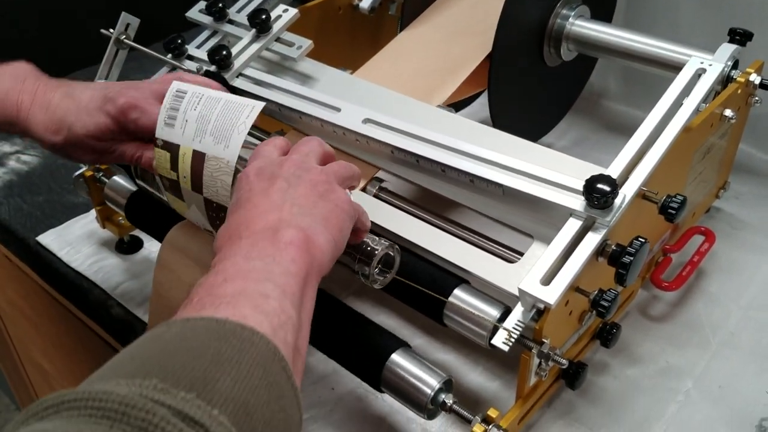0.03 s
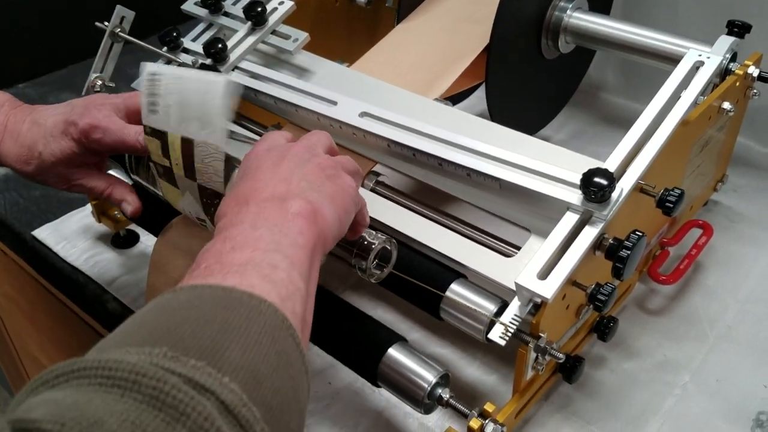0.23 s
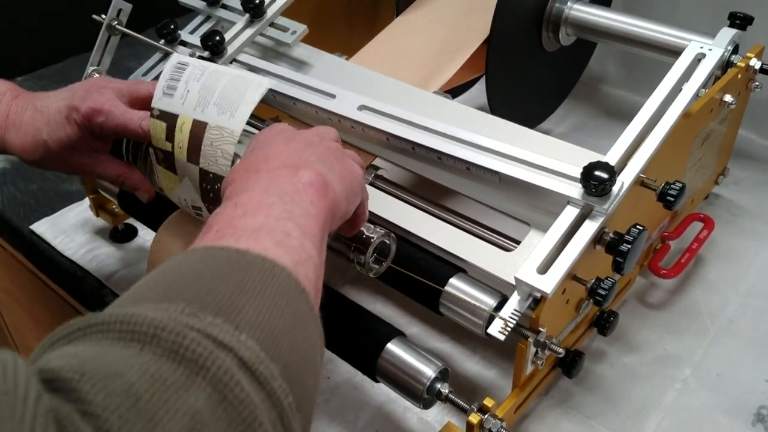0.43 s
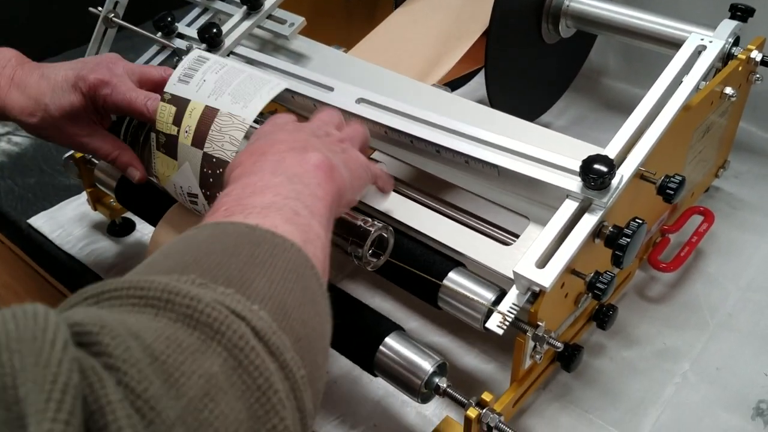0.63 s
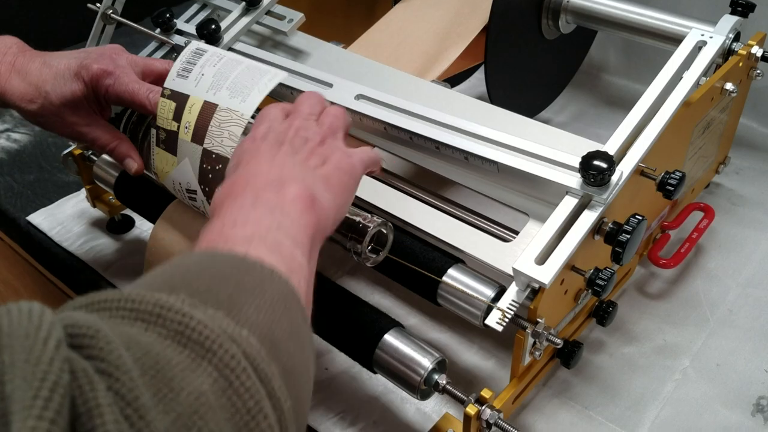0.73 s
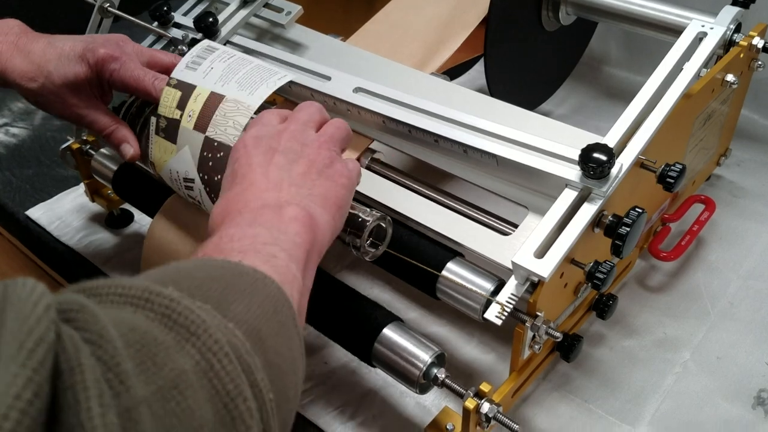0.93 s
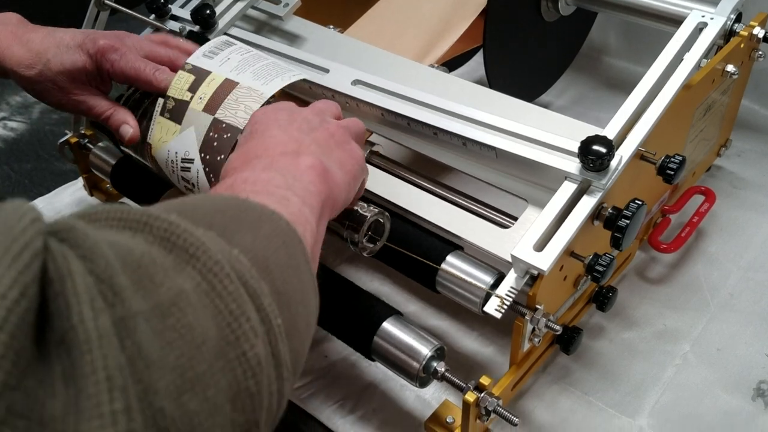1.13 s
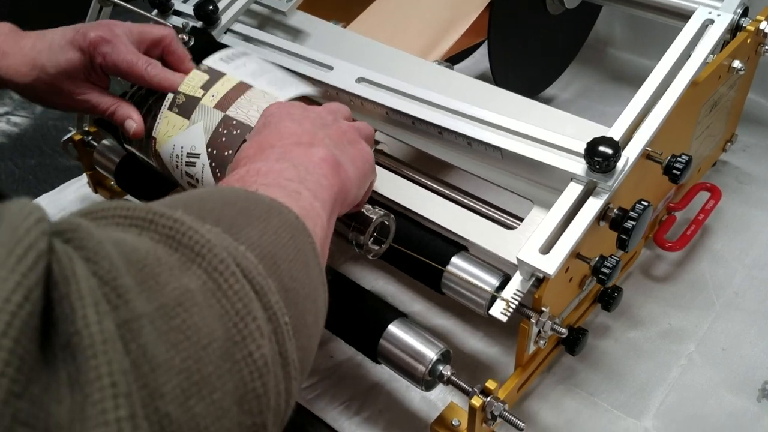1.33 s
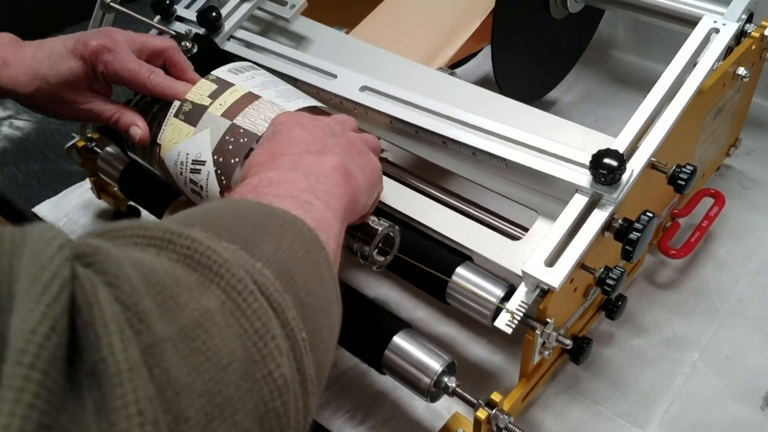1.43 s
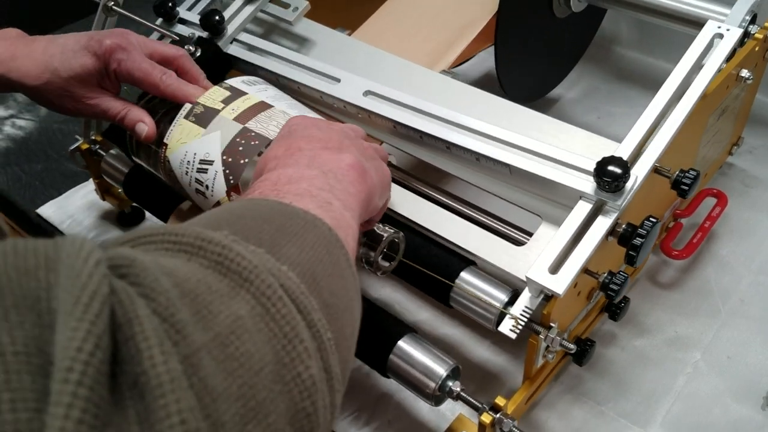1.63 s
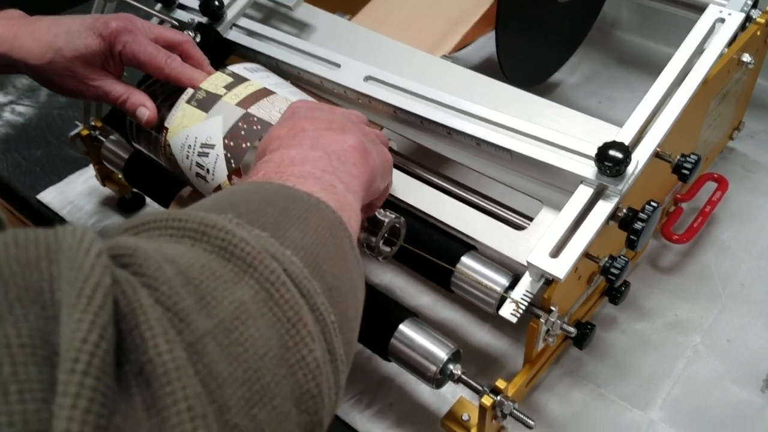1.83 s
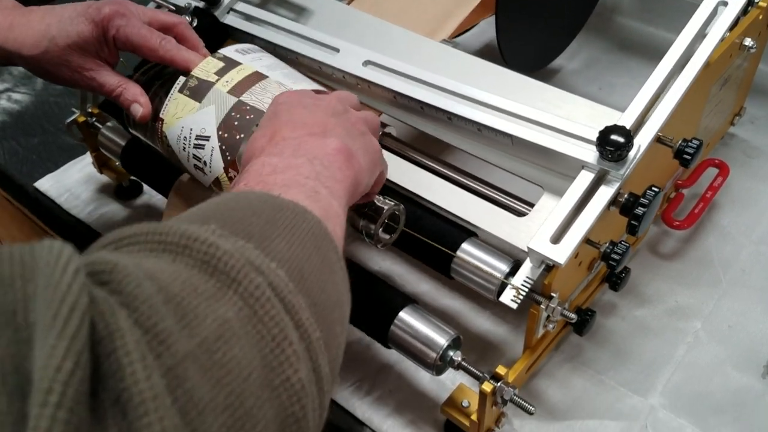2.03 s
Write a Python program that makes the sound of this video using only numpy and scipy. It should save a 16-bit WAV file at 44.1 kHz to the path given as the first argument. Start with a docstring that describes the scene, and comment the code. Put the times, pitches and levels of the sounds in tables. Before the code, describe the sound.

A glass bottle rubbed and turned by palms on a label jig, knocking the frame hard twice

```python
"""Palms rub over the paper label of a glass bottle, turned and pressed onto the rubber rollers of a jig.
The rubbing is shaped noise. The bottle knocks hard twice on the frame, with four weaker rebounds:
ringing modes with bursts of noise, one of them the bright top of the hardest knock.
The label snaps (noise bursts), flaps (short ringing modes) and scrapes (noise with resonances).
Small ticks, soft low pushes, a rattle and two dull taps are heard over workshop air noise and hum."""
import sys
import numpy as np
from scipy import signal
from scipy.fft import rfft, irfft, next_fast_len
from scipy.io import wavfile
from scipy.ndimage import uniform_filter1d, map_coordinates

SR = 44100
rng = np.random.default_rng(int(sys.argv[2]) if len(sys.argv) > 2 else 0)


def dump(signal):
    """Clip the signal to [-1, 1] and save it as 16-bit WAV at the path in sys.argv[1]."""
    limited = np.clip(np.atleast_2d(signal).T, -1, 1)
    pcm = np.round(limited * 32767).astype(np.int16)
    wavfile.write(sys.argv[1], SR, pcm)


N = 92345
T = np.arange(SR // 4) / SR  # time axis of one short sound, in seconds

# How alike left and right are in rubbing sounds: f/Hz, likeness (1 = same, 0 = unrelated)
RUB_ALIKE = [(500, 0.95), (2000, 0.29), (5000, -0.12), (14000, -0.22)]
# Tone colour of the short noise bursts and of the scrape's hiss: f/Hz, relative level/dB per Hz
PAPER_COLOUR = [(700, -50), (1300, 0), (1900, -6), (2600, -27), (3700, -17.5), (4500, -13), (7300, -10.5),
                (8300, -14.5), (10600, -17), (12900, -5), (16300, -8)]
# Tone colour of a hard crack: f/Hz, relative level/dB per Hz
CRACK_COLOUR = [(900, -31), (1800, -5), (2900, -11.5), (3700, -4), (6000, -7.5), (7000, -9.5), (8700, -6),
                (9700, -14), (11300, -2.5), (13000, -12), (15200, -7), (16300, -10)]


def amp(db):
    """Turns decibels into a gain."""
    return 10 ** (np.asarray(db) / 20)


def unit(x):
    """Scales a sound to rms 1."""
    return x / np.sqrt(np.mean(x ** 2) + 1e-20)


def along(points, hz):
    """Reads a (frequency, value) table at any frequency, on a log axis."""
    f, v = np.transpose(points)
    return np.interp(np.log(hz + 1), np.log(f + 1), v)


def curves(rows):
    """Draws straight lines between table rows: one curve for each column after the time."""
    s, *cols = np.transpose(rows)
    return [np.interp(np.arange(N) / SR, s, c) for c in cols]


def filtered(x, response):
    """Filters a sound by multiplying its spectrum with a response."""
    m = next_fast_len(x.shape[-1] + 8192)  # spare room keeps the end from wrapping to the start
    spectrum = rfft(x, m) * response(np.fft.rfftfreq(m, 1 / SR))
    return irfft(spectrum, m)[..., :x.shape[-1]]


def sides(pan_db):
    """Left and right gains; pan_db is how much louder the left is."""
    return amp(np.multiply.outer([.5, -.5], pan_db))


def rush(spectrum, alike, patchy_db):
    """Stereo noise of rms 1, with smooth patches of random gain over time and frequency."""
    z = signal.stft(rng.standard_normal((2, N)), nperseg=512)[2]
    field = rng.standard_normal(z.shape[1:])
    field = uniform_filter1d(field, size=6, axis=0)
    field = uniform_filter1d(field, size=8, axis=1)
    pair = signal.istft(z * amp(patchy_db * unit(field)), nperseg=512)[1][:, :N]

    def mid_side_response(hz):
        turn = np.arccos(np.clip(along(alike, hz), -1, 1)) / 2
        return amp(along(spectrum, hz)) * [np.cos(turn), np.sin(turn)]

    mid, side = filtered(pair, mid_side_response)
    return unit(np.array([mid + side, mid - side]))


def grain(depth_db):
    """A fast random gain of rms 1 that makes a sound rough."""
    per_s = 150  # random points per second
    knots = rng.standard_normal(int(N * per_s / SR) + 4)
    return unit(amp(depth_db * map_coordinates(knots, [np.arange(N) * per_s / SR])))


def ring(modes, rise_s, scatter_db):
    """Dying sine modes (f/Hz, level/dB, t60/s) of alternate sign, levels varied on every call."""
    total = 0
    for k, (hz, db, t60) in enumerate(modes):
        level_db = db + scatter_db * rng.standard_normal() - 60 * T / t60
        total = total + (-1) ** k * amp(level_db) * np.sin(2 * np.pi * hz * T)
    return total * (1 - np.exp(-T / rise_s))


def tilted(modes, tilt_db, pivot_hz):
    """Makes modes brighter or duller by tilt_db per octave around a pivot."""
    return [(hz, db + tilt_db * np.log2(hz / pivot_hz), t60) for hz, db, t60 in modes]


def burst(spectrum, t60, alike, centre_hz=8000, octaves=10, spike_db=-60, rise_s=.0001):
    """A dying stereo noise burst around a centre frequency, led by a faster-dying spike."""
    spike_t60_s = 0.0074
    a, b = rng.standard_normal((2, len(T)))
    turn = np.arccos(np.clip(alike, -1, 1)) / 2
    pair = np.cos(turn) * a + np.multiply.outer([1, -1], np.sin(turn) * b)

    def response(hz):
        bell = np.exp(-.5 * (np.log2((hz + 1) / centre_hz) / octaves) ** 2)
        return amp(along(spectrum, hz)) * bell

    decay = amp(-60 * T / t60) + amp(spike_db - 60 * T / spike_t60_s)
    return unit(filtered(pair, response)) * decay * (1 - np.exp(-T / max(rise_s, 1 / SR)))


def swing(hz, peak_s):
    """A short swing whose strength peaks at peak_s and then dies quickly."""
    return T / peak_s * np.exp(1 - T / peak_s) * np.sin(2 * np.pi * hz * T)


def silence():
    """An empty stereo stretch with spare room at the end."""
    return np.zeros((2, N + SR))


def add(out, s, sound, pan_db, lag_s=0):
    """Places a sound at time s; the left side hears it lag_s after the right."""
    sound = np.broadcast_to(sound, (2, len(T))) * sides(pan_db)[:, None]
    for ch, at in enumerate([s + lag_s / 2, s - lag_s / 2]):
        out[ch, round(at * SR):][:len(T)] += sound[ch]


def palms():
    """Skin sliding on paper: hiss, a bright top and a rough middle coloured by the bottle."""
    # Palms on the label: t/s, hiss level/dB, top over hiss/dB, middle over hiss/dB,
    # left over right/dB (hiss and top only)
    strokes = [(0, -54, 7, 1.5, -0.5), (0.03, -53.5, 8, 3, -1), (0.11, -55, 5, 2, 0),
               (0.15, -54.5, -13, 6, -4), (0.22, -56.5, 5.5, 8.5, -2.5), (0.3, -61.5, 4, 2.5, -2.5),
               (0.36, -56.5, 5, 3.5, -1), (0.47, -52.5, 3.5, 1, -1.5), (0.53, -55.5, 6.5, 5, -2),
               (0.565, -66.5, -7, 5, -3), (0.6, -70, 0, 3.5, -3), (0.72, -74, 3, 2.5, -2),
               (0.82, -69.5, 1, 4.5, -3), (0.86, -59.5, 3, 3.5, -3), (0.91, -53, 3, 2, -1),
               (0.96, -51, 3.5, 4, -3.5), (1.03, -54, 4, 1, -0.5), (1.065, -58, -6, -1, -15),
               (1.095, -51.5, -7.5, 4.5, -10), (1.12, -52, 1, 2, -4.5), (1.14, -55, -2, -1.5, -3),
               (1.17, -57, -1, 0, -2), (1.2, -60.5, -3.5, -0.5, -2), (1.26, -62, -2, -1, -3),
               (1.4, -62.5, 3.5, 2, -2), (1.49, -62.5, 2, 0.5, -3), (1.52, -58, 3.5, 2, -1),
               (1.64, -58.5, 3.5, -0.5, -2), (1.7, -71, -1, 1.5, -3), (1.76, -77, -1, -2, -4),
               (1.81, -63.5, 1, 0, -2.5), (1.86, -78.5, 2, 4.5, -4), (1.92, -66, -2.5, -1, -4.5),
               (2.02, -66.5, -1, 3, -4), (2.09, -65, -3, 4.5, -2)]
    # Tone colours of the three parts: f/Hz, relative level/dB per Hz
    hiss_colour = [(3200, -3), (4200, -5), (6200, -5), (9000, -7), (11500, -8)]
    top_colour = [(6180, -13), (10500, -16.5), (11800, -4.5), (15100, -4.5), (16000, -5), (16300, -2)]
    middle_colour = [(400, -8), (530, -3), (750, -10), (1100, -6), (1220, -3), (1400, -7), (2500, -13),
                     (2900, -2.5), (3400, -9), (4000, -16)]

    def closed(colour):
        # both ends fall away to almost nothing
        return [(colour[0][0] * .9, -120)] + list(colour) + [(colour[-1][0] * 1.1, -120)]

    hiss_db, top_db, middle_db, pan_db = curves(strokes)
    hiss = rush(closed(hiss_colour), RUB_ALIKE, patchy_db=0.4)
    top = amp(top_db) * rush(closed(top_colour), RUB_ALIKE, patchy_db=1)
    roughness = grain(1.5)
    middle = amp(middle_db) * roughness * rush(closed(middle_colour), RUB_ALIKE, patchy_db=2.0)
    return amp(hiss_db) * ((hiss + top) * sides(pan_db) + middle)


def workshop():
    """Steady air noise plus hum made of narrow bands of noise, which waver by nature."""
    # Air of the workshop: f/Hz, relative level/dB per Hz
    air_colour = [(25, -38), (42, -11), (56, -23), (72, -7), (87, -2.5), (127, -3.5), (225, -9.5),
                  (251, -8.5), (455, -18.5), (507, -22), (665, -20.5), (741, -20.5), (2080, -29),
                  (2720, -28), (4680, -69), (16300, -57)]
    # How alike left and right are: f/Hz, likeness (1 = same, 0 = unrelated)
    air_alike = [(60, 0.83), (180, 0.95), (550, 0.39), (1650, 0.11), (4970, 0.054), (15000, 0.016)]
    # Hum bands: f/Hz, width/Hz, rms level/dB
    hum_bands = [(59, 6, -61), (119, 10, -58), (204, 5, -60), (298, 20, -72), (446, 20, -72),
                 (529, 36, -73.5)]
    air_db = -56
    hum = 0
    for hz, width, db in hum_bands:
        band = filtered(rng.standard_normal(N), lambda f: 1 / (1 + ((f - hz) / width * 2) ** 2))
        hum = hum + amp(db) * unit(band)
    return amp(air_db) * rush(air_colour, air_alike, patchy_db=-0.24) + hum


def ticks():
    """Small ticks, each a few quickly dying modes."""
    # Ticks: t/s, level/dB (lowered by 2 dB below)
    times = [(0.0252, -44), (0.6373, -37.5), (0.8075, -42), (1.3323, -46.5), (1.5086, -51), (1.6386, -51),
             (1.7702, -48), (1.939, -48), (2.0155, -51)]
    # Modes of a tick: f/Hz, level/dB, t60/s
    tick_modes = [(1510, -1, 0.029), (1694, -6.5, 0.024), (1990, -3.5, 0.011)]
    out = silence()
    for s, db in times:
        add(out, s, amp(db - 2) * ring(tick_modes, rise_s=.0008, scatter_db=1), pan_db=-2.5)
    return out[:, :N]


def short_noise_bursts():
    """Noise bursts, each with its own pitch range and decay: label snaps and a knock's bright top."""
    # Label snaps and, at 1.0539 s, the bright top of the hardest knock:
    # t/s, level/dB, left over right/dB, t60/s, centre f/Hz, width/octaves, rise/s
    events = [(.0678, -35.5, -5, 0.023, 3540, 0.83, .001), (.1327, -14, 1.5, 0.0066, 11000, 1.53, 0.00015),
              (.1335, -24.5, 4, 0.018, 9050, 0.74, 0.00027), (.167, -23.5, 8, 0.017, 12000, 1.1, 0.0011),
              (.1688, -25.5, -4, 0.031, 10900, 2.5, 0.00076), (.5496, -42, -1, .022, 10800, .6, .001),
              (.7656, -56, -4, 0.044, 5200, .28, 0.00086), (.9916, -33.5, -4, 0.017, 5000, 1.34, .0002),
              (1.0046, -35.5, 2, 0.04, 13200, 0.3, .001), (1.0539, -14, 3, 0.0132, 11230, 0.17, .0003),
              (1.1085, -27, -3.5, 0.021, 6460, 0.88, .002), (1.161, -43, -1, 0.056, 14000, .15, .005)]
    out = silence()
    for s, db, pan_db, t60, hz, octaves, rise_s in events:
        noise = burst(PAPER_COLOUR, t60, alike=0, centre_hz=hz, octaves=octaves, rise_s=rise_s)
        add(out, s, amp(db) * noise, pan_db)
    return out[:, :N]


def catches():
    """The label edge catches and lets go: a short run of tiny random slips makes the paper ring."""
    # Catches: t/s, level/dB, brightness/dB per octave
    events = [(.1328, -28, 0.5), (0.1367, -35, -4), (.1645, -38, -3), (0.1709, -25, -2.5), (.1738, -28, 8),
              (.1922, -30, -3), (.2022, -37, -1)]
    # Modes of the flapping paper: f/Hz, level/dB, t60/s
    flap_modes = [(830, -11.5, 0.022), (1380, -21, .02), (1833, 2.5, 0.019), (2390, -15, 0.028),
                  (2960, -4.5, 0.014), (3550, -0.5, 0.018)]
    slip_s = .0007  # the slips fade with this time constant
    out = silence()
    for s, db, tilt_db in events:
        modes = tilted(flap_modes, tilt_db, pivot_hz=flap_modes[2][0])
        slips = rng.standard_normal(len(T)) * np.exp(-T / slip_s)
        slips = slips / np.linalg.norm(slips)
        flap = signal.fftconvolve(ring(modes, rise_s=.0003, scatter_db=1.5), slips)[:len(T)]
        add(out, s, amp(db) * flap, pan_db=3, lag_s=-0.00011)
    return out[:, :N]


def scrape():
    """The label edge drags in a few uneven slips: paper hiss plus noise through body resonances."""
    # Dragging label edge: t/s, hiss level/dB, body level/dB
    drag = [(.145, -58, -69), (.157, -42, -55), (.166, -42, -40.5), (.172, -54, -37.5), (.185, -62, -46.5),
            (.195, -68, -44.5), (.215, -70, -64)]
    # Resonances of the body: f/Hz, width/Hz, level/dB
    resonances = [(370, 300, -9), (840, 460, -11.5), (1760, 280, 0.5), (2880, 360, 0.5), (3530, 330, -0.5)]
    before = (drag[0][0] - .01, -90, -90)
    after = (drag[-1][0] + .01, -90, -90)
    hiss_db, body_db = curves([before] + list(drag) + [after])

    def body_response(f):
        total = 0
        for k, (centre, width, db) in enumerate(resonances):
            damping = 1j * f * width
            total = total + (-1) ** k * amp(db) * damping / (centre * centre - f * f + damping)
        return total

    a, b = rng.standard_normal((2, N))
    body = amp(body_db) * unit(filtered(np.array([a + b, a - b]), body_response))
    hiss = amp(hiss_db) * rush(PAPER_COLOUR[3:], RUB_ALIKE, patchy_db=1.5)
    return (hiss + body) * sides(10)[:, None]


def soft_pushes():
    """Soft low pushes: each is one short low swing."""
    # Pushes: t/s, level/dB, f/Hz
    pushes = [(.185, -43.5, 188), (.95, -39.5, 128), (0.518, -38.5, 171), (1.347, -38.5, 166),
              (2.025, -46, 105)]
    out = silence()
    for s, db, hz in pushes:
        add(out, s, amp(db) * swing(hz, peak_s=0.0041), 0)
    return out[:, :N]


def knocks():
    """Glass hits the frame: bottle modes, a noise crack, a first short swing and a frame thud."""
    # Two hard blows and four weaker rebounds: t/s, level/dB, crack trim/dB, thud trim/dB,
    # left over right/dB (not the thud), brightness of the ring/dB per octave
    blows = [(0.932, -14, 0.5, -1, -1.5, 2.5), (0.94, -26, -2, -9, 4.5, -8.5),
             (1.054, -8.5, 3.5, 0.5, -1, -1.5), (1.0824, -26.5, -5, -1.5, 1, -5.5),
             (1.092, -31.5, 4, -23, -5, -7.5), (1.1082, -36.5, 7.5, -15.5, -3, -11)]
    # Modes of the bottle: f/Hz, level/dB, t60/s
    bottle_modes = [(512, -2.5, 0.02), (796, -0.5, 0.017), (1080, -4.5, 0.027), (1215, -18, 0.25),
                    (1293, -7, 0.063), (1610, -12.5, 0.057), (1953, -16, 0.08), (2337, -9, 0.034),
                    (2922, 3.5, 0.019), (4530, -19, 0.023)]
    # Modes of the frame: f/Hz, level/dB, t60/s
    frame_modes = [(46.2, -18, 0.6), (102.7, -1, 0.28), (134.4, 0, 0.27), (163.8, 0.5, 0.23), (204, 1, 0.2),
                   (296, 1, 0.11)]
    ring_db, crack_base_db, clack_db, thud_base_db = -14.5, -15, -7.5, -24
    out = silence()
    for s, db, crack_db, thud_db, pan_db, tilt_db in blows:
        modes = tilted(bottle_modes, tilt_db, pivot_hz=1200)
        glass = amp(ring_db) * ring(modes, rise_s=.00015, scatter_db=1.5)
        crack = burst(CRACK_COLOUR, 0.043, alike=-0.3, spike_db=6.5)
        crack = amp(crack_db + crack_base_db) * crack
        clack = amp(clack_db) * swing(1164, peak_s=.0004)
        add(out, s, amp(db) * (glass + crack + clack), pan_db)
        thud = ring(frame_modes, rise_s=0.016, scatter_db=1)
        add(out, s, amp(db + thud_db + thud_base_db) * thud, 0)
    return out[:, :N]


def rattle():
    """The bottle settles on the rollers after the hardest knock: rough, patchy noise."""
    # Settling bottle: t/s, level/dB
    settling = [(1.052, -90), (1.058, -41), (1.075, -47), (1.086, -48), (1.1, -48), (1.112, -44),
                (1.13, -46), (1.16, -64), (1.2, -88)]
    # Its tone colour: f/Hz, relative level/dB per Hz
    colour = [(250, -60), (350, -14.5), (510, -9.5), (940, -17), (1200, -3), (1450, -10), (1950, -4),
              (2500, -9.5), (4000, -16), (5500, -60)]
    level_db, = curves(settling)
    return amp(level_db) * grain(5) * rush(colour, RUB_ALIKE, patchy_db=3.5)


def dry_tap():
    """A tap felt through the camera: modes that reach left and right unequally, plus a faint crack."""
    # Modes: f/Hz, left level/dB, right level/dB, first swing (+1 or -1), right lag/turns, t60/s
    tap_modes = [(437, -19, -24, 1, 0.54, 0.029), (620, -39, -17, -1, 0.14, 0.025),
                 (990, -17.5, -25, -1, 0.075, 0.015), (1440, -17.5, -33, -1, 0.13, 0.0086),
                 (2090, -19, -39, 1, 0, 0.0083), (2550, -30, -55, -1, 0, 0.012)]
    rise_turns, low_cut_hz = 0.27, 380
    tap = 0
    for hz, left_db, right_db, first, turns, t60 in tap_modes:
        rise = 1 - np.exp(-T * hz / rise_turns)  # low modes take longer to swell
        level = amp([[left_db], [right_db]] - 60 * T / t60)
        wave = np.sin(2 * np.pi * (hz * T - np.array([[0], [turns]])))
        tap = tap + np.sign(first) * rise * level * wave
    tap = filtered(tap, lambda f: (1j * f / low_cut_hz / (1 + 1j * f / low_cut_hz)) ** 2)
    crack = amp(-31) * burst(CRACK_COLOUR, .01, alike=.2)
    out = silence()
    add(out, 1.544, tap + crack, 0)
    return out[:, :N]


def soft_bump():
    """A soft bump, mostly on the left: one smooth pulse followed by a low ring."""
    # Ring after the bump: f/Hz, level/dB, t60/s
    bump_modes = [(150, -1, 0.045)]
    bump_s, width_s, pulse_hz = 1.9162, .00038, 600
    lead = 3 * width_s  # the pulse starts this long before its middle
    pulse = -np.exp(-.5 * ((T - lead) / width_s) ** 2) * np.cos(2 * np.pi * pulse_hz * (T - lead))
    after = ring(bump_modes, rise_s=0.0011, scatter_db=2.0)
    after = np.pad(after, (round(2 * lead * SR), 0))[:len(T)]
    out = silence()
    add(out, bump_s - lead, amp(-34.5) * (pulse + after), pan_db=15.5)
    return out[:, :N]


def room(x):
    """Room echo: a noise tail in which each frequency dies at its own speed."""
    # Echo decay: f/Hz, t60/s
    decay = [(200, 0.18), (2000, 0.72), (12000, 0.19)]
    hz, t, z = signal.stft(rng.standard_normal((2, SR // 2)), SR, nperseg=256)
    tail = signal.istft(z * amp(-60 * t / along(decay, hz)[:, None]), SR, nperseg=256)[1]
    tail = tail / np.linalg.norm(tail[0])
    delayed = np.pad(x.mean(0), (120, 0))[None]  # the echo starts 120 samples late
    return signal.fftconvolve(delayed, tail, axes=1)[:, :N]


def scene():
    """Adds up all sources; the room answers the short contacts only."""
    contacts = ticks() + short_noise_bursts() + catches() + soft_pushes() + knocks()
    echo = amp(-15) * room(contacts)
    steady = palms() + workshop()
    return steady + contacts + echo + scrape() + rattle() + dry_tap() + soft_bump()


def record(dry):
    """The left port is brighter; the top of the band falls steeply, and the signal rests off zero."""
    # Microphone ports: f/Hz, left over right/dB
    ports = [(100, -1.5), (1500, -2.5), (5000, 1), (12000, 5.5)]
    top_hz, edge_hz, edge_db_per_khz, offset = 17000, 15650, 42, -.0006

    def response(hz):
        edge = amp(-edge_db_per_khz * np.maximum(hz - edge_hz, 0) / 1000)
        return sides(along(ports, hz)) * edge * (hz < top_hz)

    return offset + filtered(dry, response)


dry = scene()
out = record(dry)
dump(out)
```